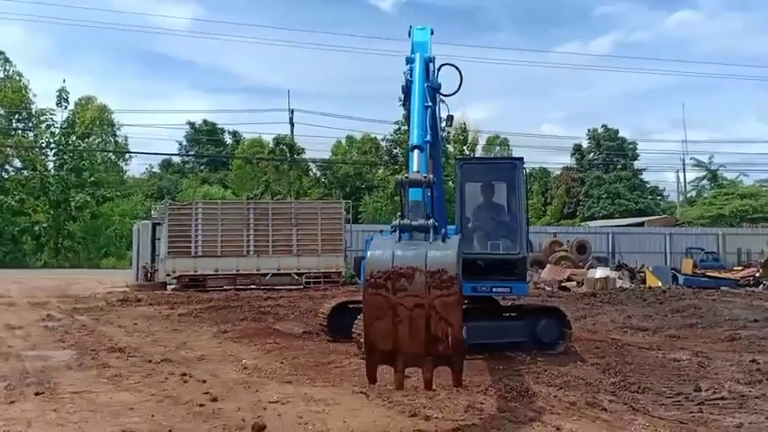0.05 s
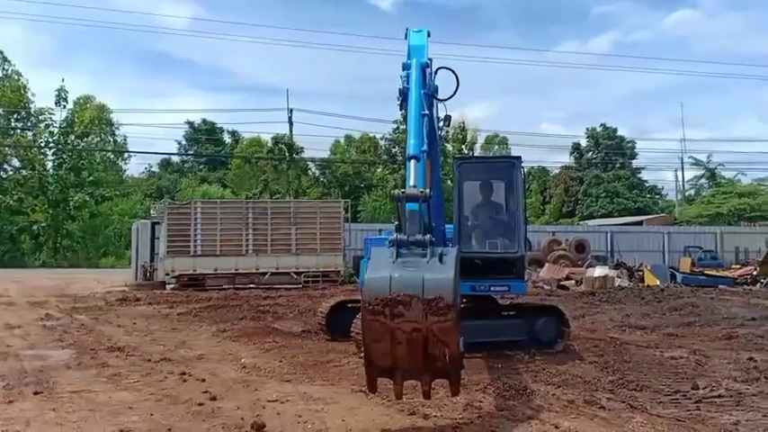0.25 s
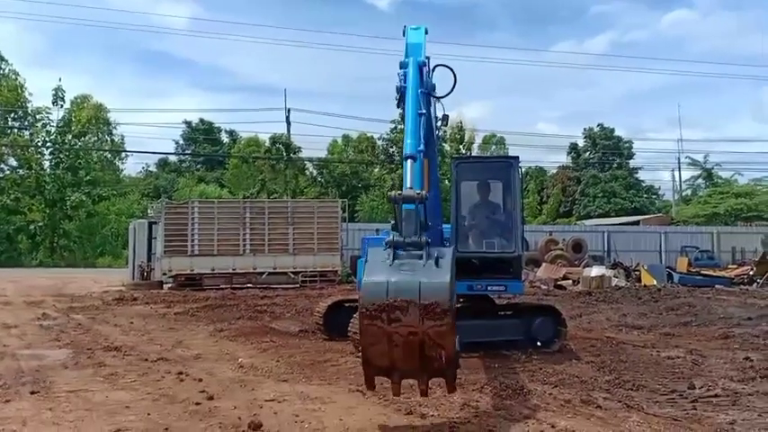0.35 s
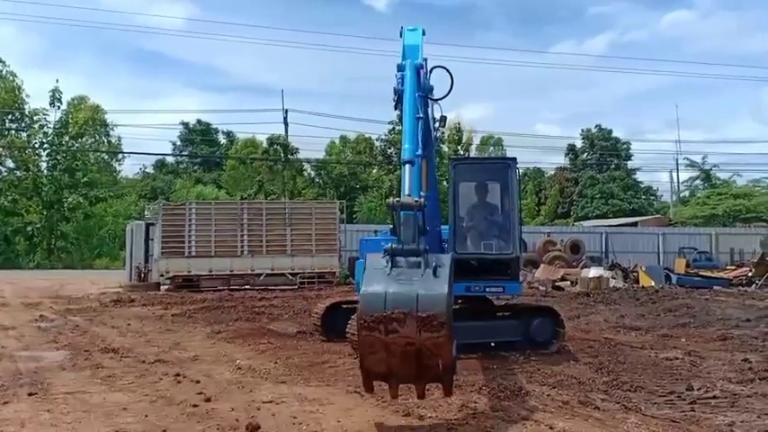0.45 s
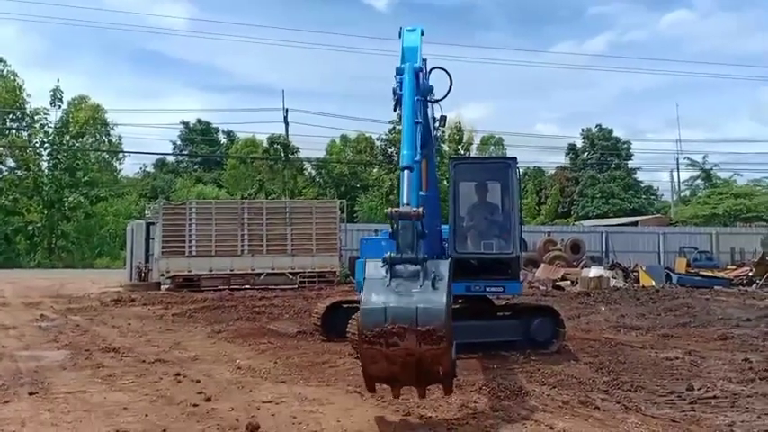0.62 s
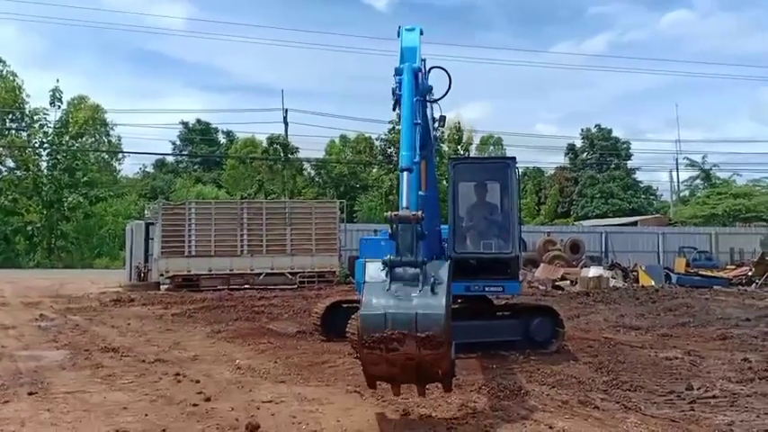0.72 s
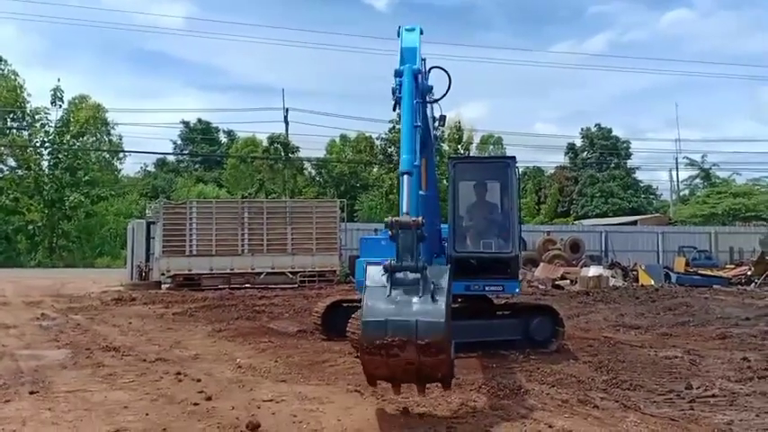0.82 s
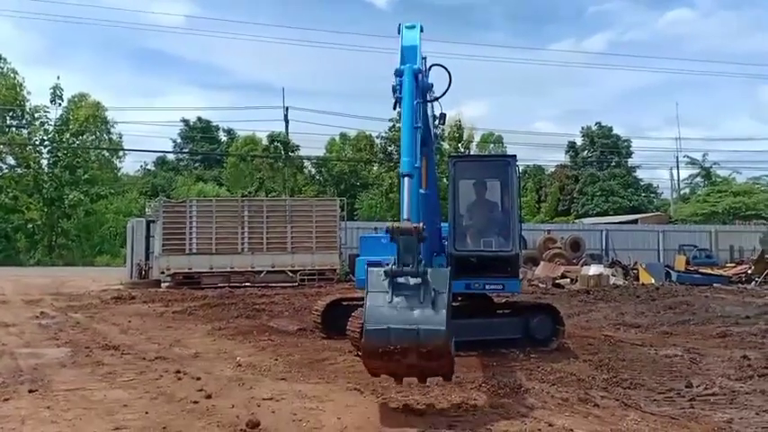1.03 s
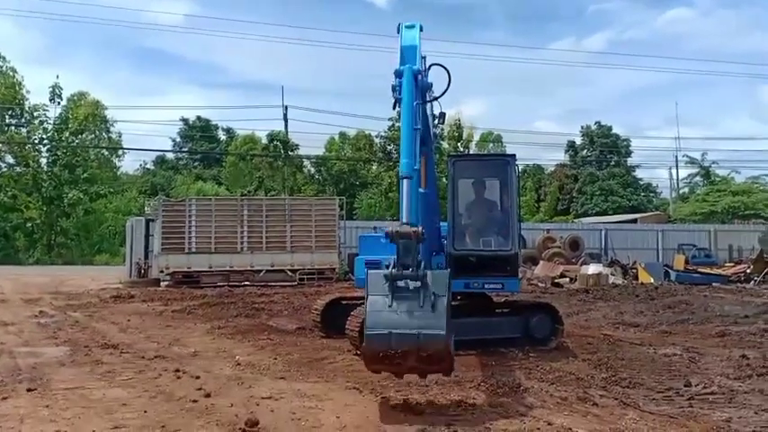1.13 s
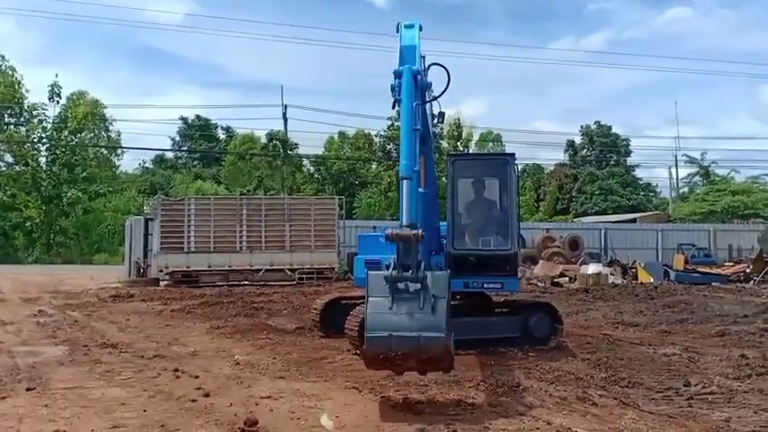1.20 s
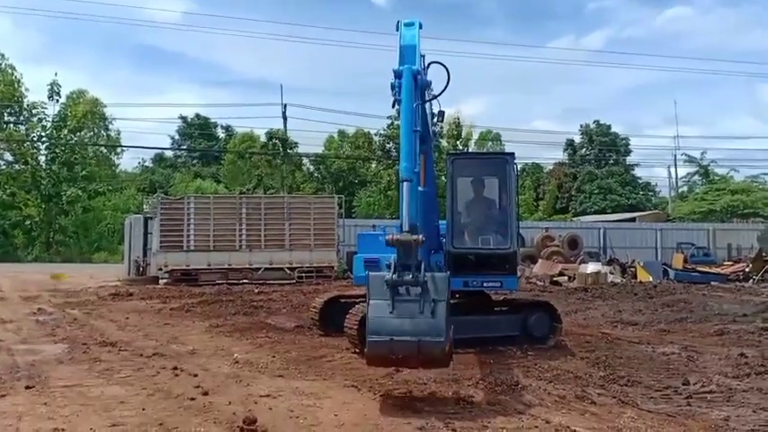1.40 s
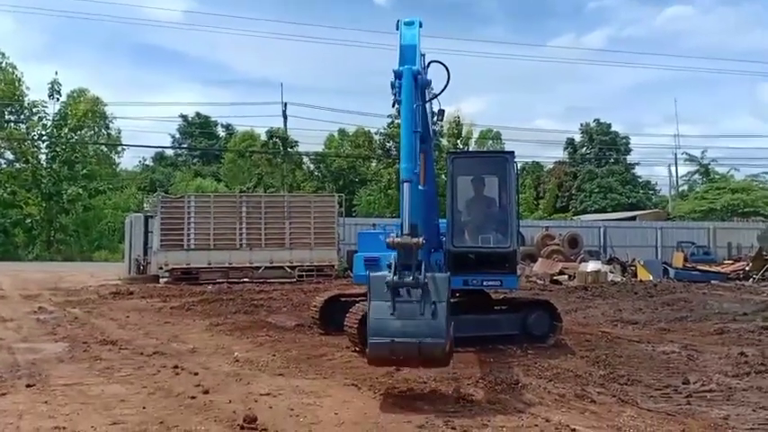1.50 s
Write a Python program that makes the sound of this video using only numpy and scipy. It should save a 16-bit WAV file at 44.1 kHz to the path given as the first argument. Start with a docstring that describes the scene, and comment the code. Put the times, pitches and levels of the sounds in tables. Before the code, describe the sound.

An excavator's diesel engine drones with a hydraulic whine as its steel bucket clanks.

```python
"""A four-cylinder diesel drones under the whine of a hydraulic pump: an excavator curling its bucket in
a dirt yard, slightly right of centre in the stereo microphone. Twice the slack in the linkage is taken
up: a quick run of steel blows rings the bucket and the link, and the hollow arm booms after it.
In between a pin knocks once, and now and then grit ticks off the bucket. The yard scatters the
clanks back from all sides."""
import sys
import numpy as np
from scipy import signal
from scipy.fft import rfft, irfft
from scipy.io import wavfile
from scipy.ndimage import uniform_filter1d

SR = 44100
rng = np.random.default_rng(int(sys.argv[2]) if len(sys.argv) > 2 else 0)


def bounce(signal):
    """Save signal as a 16-bit WAV file at the path given by the first command-line argument."""
    frames = np.transpose(np.atleast_2d(signal))
    limited = np.clip(frames, -1, 1)
    pcm = np.round(limited * 32767).astype(np.int16)
    wavfile.write(sys.argv[1], SR, pcm)


N = 68355

# steel blows in the linkage: start_s, level_db, tilt_db_per_octave, bucket_ring_db, link_ring_db
BLOWS = [(0.2421, -11.5, 2, -9, -10), (0.249, -12, -3.5, 0, -20), (0.2563, -3.5, -1, -4, -18),
         (0.2622, 0.5, 2, -2, -22), (0.271, -17.5, -5.5, -9.5, -14), (0.291, -10.5, -4, -22, -17.5),
         (.328, -19, -1.5, -24, -8), (0.355, -15, -3, -17.5, -10), (1.006, -21.5, 5.5, -15, -14.5),
         (1.0135, -10.5, -1, -17.5, 0), (1.032, -16.5, -3, -19.5, -23), (1.05, -17, -3, -16, -18)]
PUMP_ORDER = 36  # pump ripples per four-stroke cycle
BLOW_SIDE_DB = -7.5  # a blow reaches the microphone narrower than the engine
SIDE = np.array([[1], [-1]])  # added on the left, subtracted on the right


def undb(db):
    """Decibels to gain."""
    return 10 ** (np.asarray(db) / 20)


def unit(x):
    """Scale to rms 1."""
    return x / np.sqrt(np.mean(x ** 2))


def curve(at, rows):
    """Straight lines through the rows."""
    return np.interp(at, *np.array(rows, float).T)


def on_hz(hz, rows, column=1):
    """A column of a table read on a log-frequency axis."""
    rows = np.array(rows, float)
    return np.interp(np.log(np.maximum(hz, 1)), np.log(rows[:, 0]), rows[:, column])


def bins():
    """Frequencies of the spectrum."""
    return np.fft.rfftfreq(N, 1 / SR)


def since(start):
    """Seconds since a moment, zero before it."""
    return np.maximum(np.arange(N) / SR - start, 0)


def decay(age, t60):
    """A fall of 60 dB every t60 seconds."""
    return np.exp(-np.log(1000) * age / t60)


def burst(start, fall_s):
    """Half-millisecond rise and exponential fall."""
    age = since(start)
    return (1 - np.exp(-age / 0.00051)) * np.exp(-age / fall_s)


def wander(rate_hz):
    """Smooth random wander of spread 1."""
    return unit(irfft(rfft(rng.standard_normal(N)) * np.exp(-(bins() / rate_hz) ** 2), N))


def noise_spectrum(side_db=0, envelope=1):
    """Spectrum of stereo noise under an envelope, alike in the bass and diffuse in the treble."""
    # stereo width at the microphone: frequency_hz, side_against_mid_db
    spread = [(60, -13), (250, -25.5), (480, -8), (750, -9.5), (1100, -4.5), (2400, -5.5), (4000, -1),
              (12000, -2.5)]
    mid, side = rfft(rng.standard_normal((2, N)) * envelope)
    width = undb(on_hz(bins(), spread) + side_db)
    return (mid + side * width * SIDE) / np.hypot(1, width)


def noise(colour, envelope=1, side_db=0):
    """Coloured stereo noise whose rms follows the envelope."""
    return irfft(noise_spectrum(side_db, envelope) * unit(undb(on_hz(bins(), colour))), N)


def tone(cycles, order, waver_db, drift_rad):
    """One multiple of the engine cycle, wavering in level and phase."""
    level = np.sqrt(2) * undb(waver_db * wander(12.8))
    return level * np.sin(2 * np.pi * (order * cycles + rng.random()) + drift_rad * wander(6.9))


def yard_hiss():
    """The faint, even hiss of the yard."""
    # hiss colour: frequency_hz, relative_db
    colour = [(1000, -5), (7000, 8), (9500, -5.5), (13500, 4), (14500, -29)]
    return undb(-70.5) * noise(colour)


def yard_echo(clanks, level_db=-10.5, rise_s=0.0099, low_cut_hz=450):
    """Diffuse tail from fence, truck and trees, different in each channel and thin in the bass."""
    t, hz = since(0), bins()
    scatter = rng.standard_normal((2, N)) * (1 - np.exp(-t / rise_s)) * decay(t, t60=0.55)
    spectrum = rfft(unit(scatter) / np.sqrt(N))
    tail = irfft(spectrum * hz / np.hypot(hz, low_cut_hz), N)[:, :N // 2]
    return undb(level_db) * signal.fftconvolve(clanks.mean(axis=0)[None], tail)[:, :N]


def engine(cycles, flare_depth=0.37, flare_firings=0.24):
    """The diesel: engine tones, fan, exhaust rumble, and clatter that flares at each firing."""
    # engine tones, every fourth order a firing harmonic: order_per_cycle, level_db
    orders = {4: -39, 5: -44, 7: -45.5, 8: -37.5, 9: -56, 10: -50, 12: -45, 14: -58, 16: -51, 18: -56, 20:
              -50, 46: -59, 50: -59.5, 72: -60, 80: -58}
    # engine effort: time_s, rumble_change_db, clatter_change_db
    effort = [(0, 0.5, 0), (.22, 1, -1), (.45, 3, 1), (.62, 3, 1), (.82, 4, -0.5), (.93, 1, -1),
              (1.2, -3.5, 0), (1.29, -1, 0), (1.55, -10.5, -1)]
    # exhaust rumble: frequency_hz, relative_db
    rumble_colour = [(20, -32), (45, -25.5), (70, -20), (100, -9), (138, 4.5), (175, -6.5), (250, -10.5),
                     (320, -10.5), (420, -18), (700, -11), (1500, -53.5)]
    # diesel clatter: frequency_hz, relative_db
    clatter_colour = [(200, -2), (450, -2.5), (750, 0.5), (1000, -5), (1600, -4), (2150, 2.5), (2700, -2),
                      (3200, -11.5), (4300, -10), (5400, -12), (6200, -23), (7200, -45), (10000, -56.5)]
    times, *levels = np.array(effort).T
    rumble_db, clatter_db = (np.interp(since(0), times, db) for db in levels)
    tones = sum(undb(db) * tone(cycles, order, waver_db=min(order / 4, 2.5),
                                drift_rad=min(order * 0.022, .6)) for order, db in orders.items())
    fan = undb(-47) * tone(cycles, order=19.5, waver_db=2, drift_rad=0.43)
    firings = 4 * cycles
    strength = undb(1.1 * rng.standard_normal(256))[firings.astype(int) % 256]  # uneven firings
    flare = unit(1 + flare_depth * strength * np.exp(-(firings % 1) / flare_firings))
    rumble = noise(rumble_colour, undb(-37 + rumble_db))
    clatter = noise(clatter_colour, undb(-35.5 + clatter_db) * flare)
    return tones + fan + rumble + clatter


def pump(cycles, side_db=-20):
    """Piston ripple of the hydraulic pump, louder under load, with a faint reflection from the sides."""
    # pump load: time_s, whine_db
    load = [(0, -35.5), (.04, -33.5), (.12, -49.5), (.22, -44.5), (.3, -38), (.5, -36), (.8, -37.5),
            (1.15, -37), (1.55, -35.5)]
    direct, reflected = (tone(cycles, PUMP_ORDER, waver_db=1.34, drift_rad=0.04) for _ in range(2))
    return undb(curve(since(0), load)) * (direct + undb(side_db) * reflected * SIDE)


def grit():
    """A few bright ticks of grit on the bucket."""
    # grains striking: start_s, level_db, fall_s
    ticks = [(0.526, -34.5, 0.012), (.6205, -21, 0.0025), (.668, -38.5, 0.0077), (1.102, -40, 0.023)]
    # tick colour: frequency_hz, relative_db
    colour = [(150, -41.5), (800, -11), (2200, -5), (3200, -3.5), (4300, 4.5), (5600, 6), (6800, -14),
              (8200, -19.5), (9500, -38), (14000, -40)]
    return noise(colour, sum(undb(db) * burst(start, fall_s) for start, db, fall_s in ticks))


def pin_knock():
    """A pin knocks dully and rattles briefly."""
    # the strike, then its rattle: start_s, level_db, t60_s
    knocks = [(0.7548, -19.5, 0.052), (0.771, -32.5, .16)]
    # knock colour: frequency_hz, relative_db
    colour = [(100, -35), (500, -11), (1100, -8), (1550, 0.5), (2000, -4), (2600, -9), (3300, -26),
              (5500, -38), (7500, -66)]
    envelope = sum(undb(db) * burst(start, t60 / np.log(1000)) for start, db, t60 in knocks)
    return noise(colour, envelope, BLOW_SIDE_DB)


def arm():
    """Low booms swell and fade in the hollow arm as it shudders."""
    # arm booms: start_s, pitch_hz, peak_db, rise_s, t60_s
    booms = [(.266, 120.7, -16, 0.024, 0.24), (.305, 145.7, -17, 0.018, 0.51),
             (.402, 141.8, -17.5, 0.045, .22), (.62, 147.4, -24.5, .04, 0.47),
             (0.813, 185.4, -28, 0.012, .14), (.808, 268.5, -29, .015, .12),
             (1.002, 133.6, -15.5, .04, 0.15), (1.04, 256.6, -25.5, 0.016, 0.43),
             (1.088, 189, -31.5, 0.048, 0.067)]
    out = 0
    for start, hz, db, rise, t60 in booms:
        age = since(start)
        swell = np.sin(np.pi / 2 * np.minimum(age / rise, 1)) * decay(since(start + rise), t60)
        out = out + undb(db) * swell * np.sin(2 * np.pi * hz * age)
    return out


def steel_modes(modes, rings_db, pivot_hz=1000, side_db=-27):
    """Steel modes gather the energy of every blow; each rings them duller or brighter by its own tilt."""
    t, out = since(0), 0
    starts, _, tilts = np.array(BLOWS).T[:3]
    for hz, db, t60 in modes:
        pushes = np.zeros(N)
        pushes[(starts * SR).astype(int)] = undb(rings_db + tilts * np.log2(hz / pivot_hz)) ** 2
        energy = signal.lfilter([1], [1, -decay(1 / SR, t60) ** 2], pushes)
        swing = uniform_filter1d(np.sqrt(energy), size=48)  # onsets softened over about 1 ms
        mid, side = np.sin(2 * np.pi * (hz * t + rng.random((2, 1))) + 0.42 * wander(45))
        out = out + undb(db) * swing * (mid + undb(side_db) * side * SIDE)
    return out


def bucket_and_link():
    """The blows set the bucket ringing long and its link more briefly."""
    # bucket modes: pitch_hz, level_db, t60_s
    bucket = [(189, -38.5, 0.73), (236, -25, .4), (303, -31, 0.61), (454, -33.5, .35), (529, -35, 0.47),
              (585, -24, .09), (623.8, -19.5, 0.16), (754, -21.5, .2), (805, -31.5, 0.57),
              (1460, -32.5, 0.46), (1605, -38, 0.19), (1820, -41.5, 0.14), (2034, -34.5, 0.48),
              (2128, -36, 0.82), (2603, -33.5, 0.53), (3026, -27.5, 0.089), (3746, -42.5, 0.59)]
    # link modes: pitch_hz, level_db, t60_s
    link = [(719, -38, .25), (2090, -21.5, 0.12), (2290, -23, 0.06), (2508, -25, .14), (4373, -31, 0.03),
            (4730, -34, .07), (5400, -53, .06)]
    bucket_db, link_db = np.array(BLOWS).T[3:]
    return steel_modes(bucket, bucket_db) + steel_modes(link, link_db)


def linkage(rise_s=0.0013, crack_db=-1.5, crack_s=0.0079, pivot_hz=2000):
    """Each blow is a short crack and a dense steel ring that dies band by band."""
    # dense ring of the steel: frequency_hz, relative_db, t60_s
    steel = [(170, -5, 0.46), (249, -4, 0.28), (450, -3.5, 0.25), (685, 1, 0.15), (970, -7, 0.32),
             (1650, -6.5, 0.26), (2350, 0, 0.17), (2820, -2.5, .14), (3440, -8.5, 0.12), (4800, -19, 0.16),
             (5310, -10.5, 0.089), (6350, -24.5, 0.11), (7900, -39, 0.15), (13100, -58.5, 0.21)]
    hz, out = bins(), 0
    spectrum = noise_spectrum(BLOW_SIDE_DB) * unit(undb(on_hz(hz, steel)))
    edges_hz = np.geomspace(150, 15000, 15)
    for low, high in zip(edges_hz, edges_hz[1:]):
        centre = np.sqrt(low * high)
        t60, octaves = on_hz(centre, steel, column=2), np.log2(centre / pivot_hz)
        power = 0
        for start, db, tilt, *_ in BLOWS:
            age = since(start)
            attack = (1 - np.exp(-age / rise_s)) * (1 + undb(crack_db) * np.exp(-age / crack_s))
            power = power + (undb(db + tilt * octaves) * attack * decay(age, t60)) ** 2
        band = irfft(spectrum * ((hz >= low) & (hz < high)), N)
        out = out + np.sqrt(power) * band
    return undb(-15.5) * out


def scene():
    """The whole machine in its yard, slightly right of centre at the microphone."""
    # pump whine, which follows the crankshaft: time_s, pitch_hz
    whine = [(0, 572.5), (.06, 574.9), (0.149, 582.3), (0.248, 597.3), (0.381, 598.5), (0.759, 599.4),
             (1.049, 598), (1.25, 594.2), (1.55, 594.5)]
    # stereo balance: frequency_hz, left_minus_right_db
    lean = [(60, -1.5), (500, -1.5), (1200, -1.2), (4000, -2), (10000, -0.5)]
    cycles = np.cumsum(curve(since(0), whine)) / PUMP_ORDER / SR  # four-stroke cycles turned
    clanks = linkage() + bucket_and_link() + pin_knock()
    yard = engine(cycles) + pump(cycles) + clanks + yard_echo(clanks) + arm() + grit() + yard_hiss()
    return irfft(rfft(yard) * undb(on_hz(bins(), lean) * SIDE / 2), N)


def record(dry, ceiling=.85, top_hz=14500):
    """The recorder rounds the loudest peaks and cuts the top."""
    rounded = dry / (1 + (dry / ceiling) ** 6) ** (1 / 6)
    return signal.sosfilt(signal.ellip(8, .2, 80, top_hz, fs=SR, output="sos"), rounded)


dry = scene()
out = record(dry)
bounce(out)
```